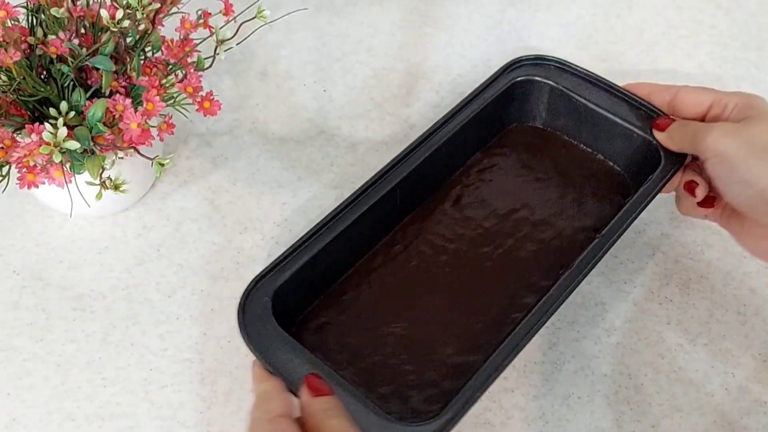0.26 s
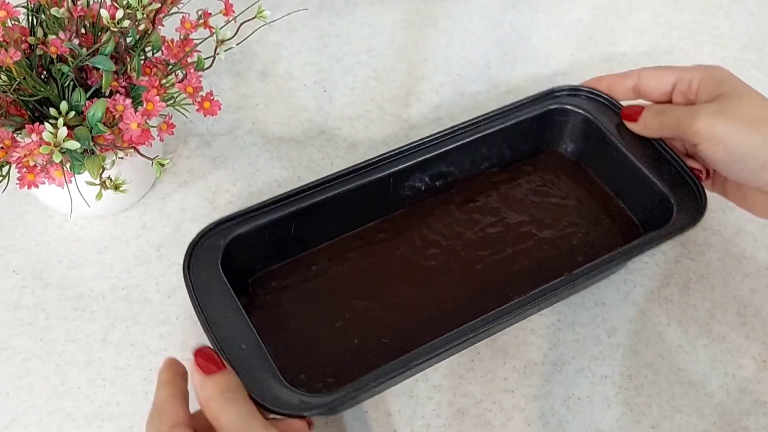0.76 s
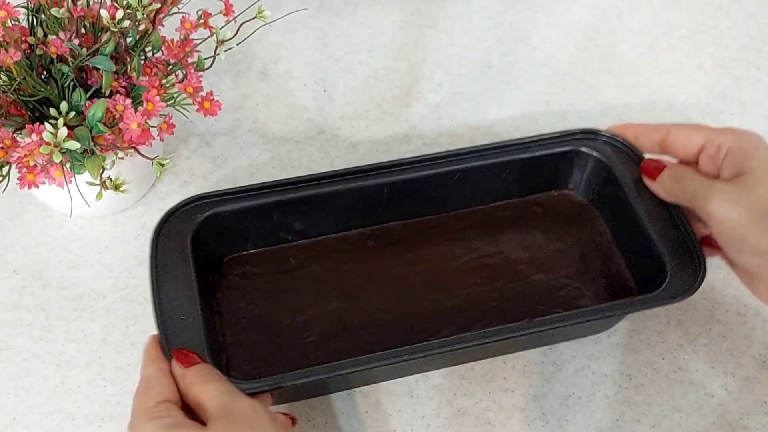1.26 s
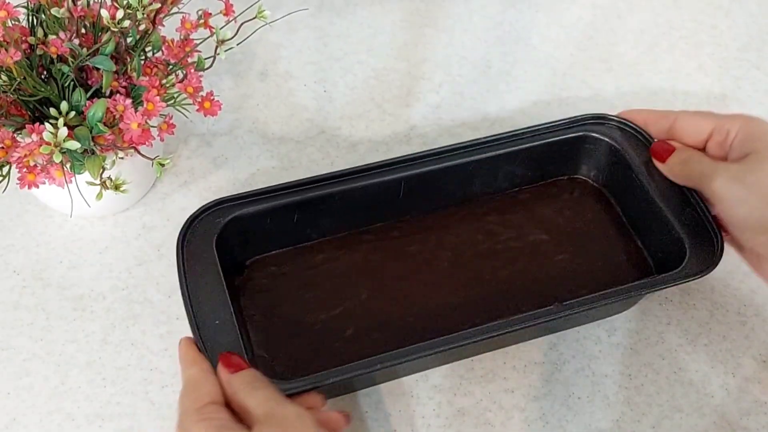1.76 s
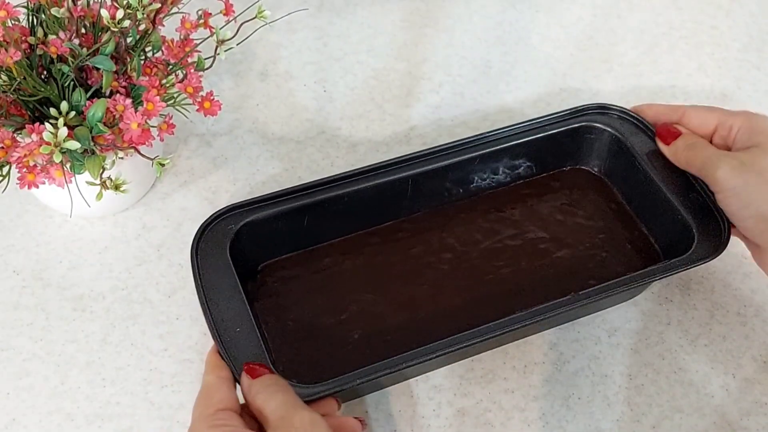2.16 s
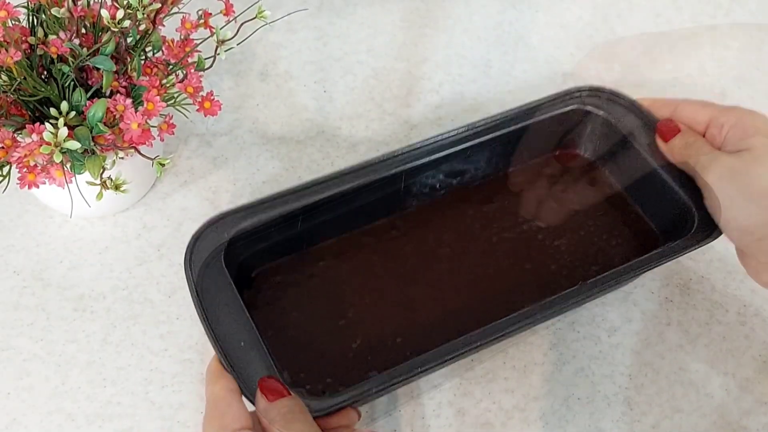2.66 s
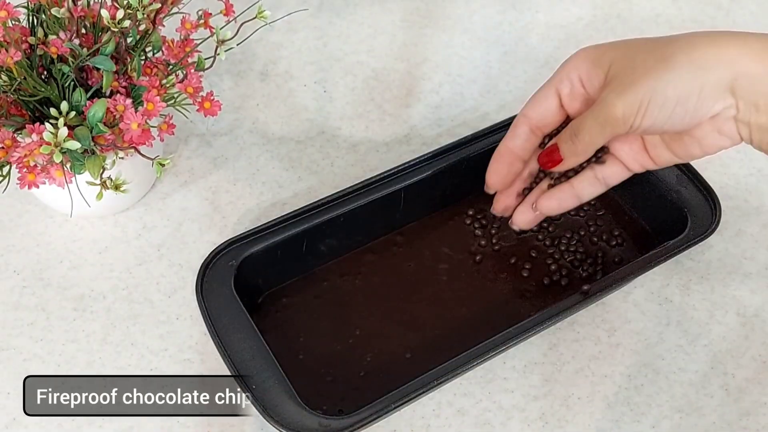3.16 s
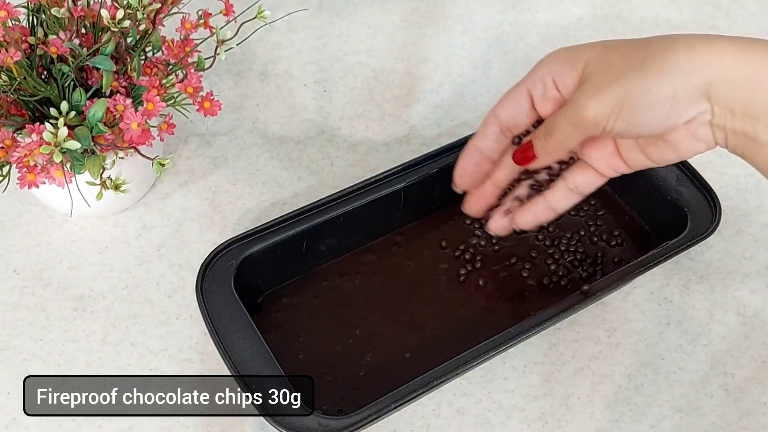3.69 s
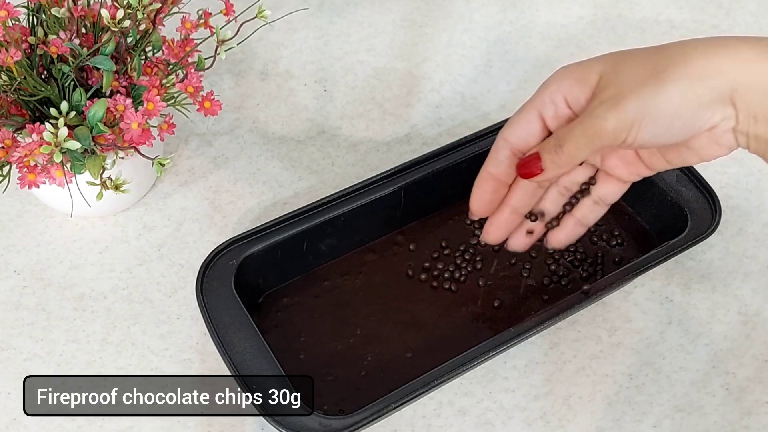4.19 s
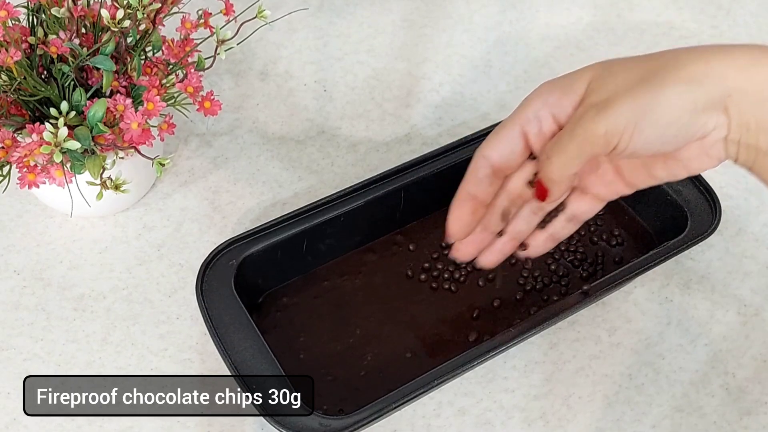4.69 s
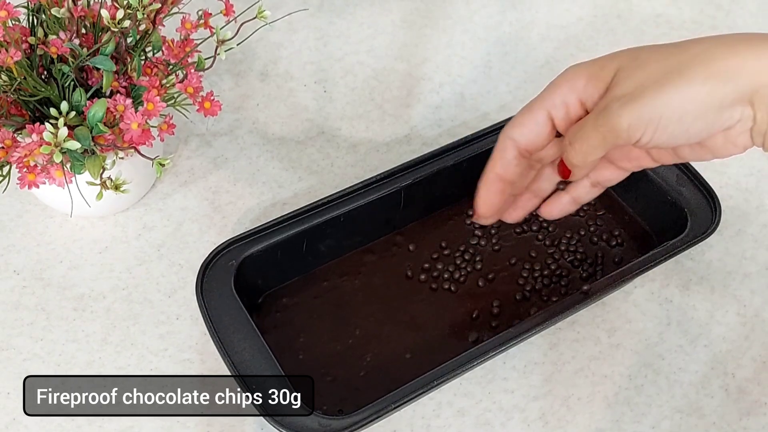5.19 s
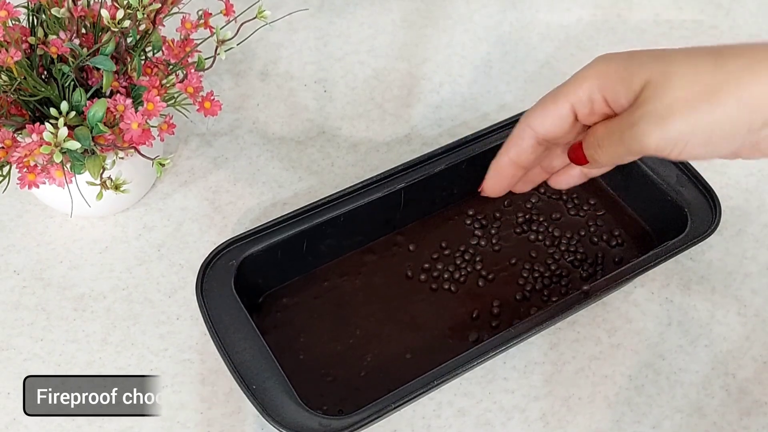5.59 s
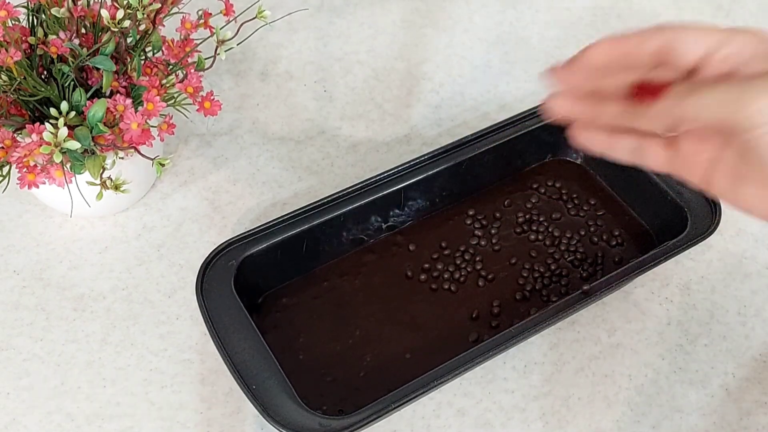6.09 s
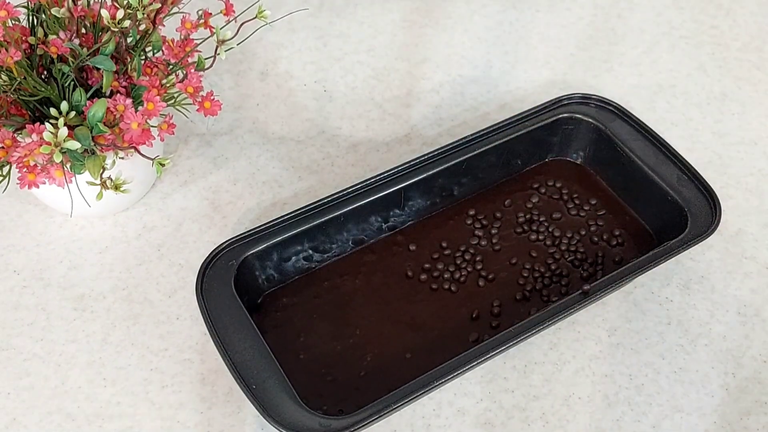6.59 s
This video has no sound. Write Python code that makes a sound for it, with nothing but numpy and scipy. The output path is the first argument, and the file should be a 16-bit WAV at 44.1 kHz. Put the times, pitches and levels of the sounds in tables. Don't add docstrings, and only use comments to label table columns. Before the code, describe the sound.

Low scraping and dull bumps of a baking pan, two hard ringing clunks, then sparse light chip ticks and faint skin rubs in a quiet room.

```python
import sys
import numpy as np
from scipy import signal
from scipy.fft import rfft, irfft, next_fast_len
from scipy.io import wavfile

SR = 44100
rng = np.random.default_rng(int(sys.argv[2]) if len(sys.argv) > 2 else 0)


def inscribe(sig):
    pcm = np.round(np.clip(np.atleast_2d(sig).T, -1, 1) * 32767)
    wavfile.write(sys.argv[1], SR, pcm.astype(np.int16))


def attenuation_scalar(level_db):
    decades = np.asarray(level_db, float) / 20
    return 10 ** decades


N = 302085

# f/Hz, level/dB [per Hz]
SLIDE_COLOUR = [(24, -35), (45, -18.5), (101, 0.5), (171, -19), (305, -12.5), (420, -14), (790, -19),
                (1210, -29.5), (2210, -31), (3400, -39), (7000, -41), (12800, -38), (16000, -42)]
# t/s, level/dB
DRAG = [(0.0, -57.5), (0.37, -60), (0.48, -72), (0.7, -72.5), (0.95, -70.5), (1.05, -62.5), (1.3, -61),
        (2.03, -67), (2.18, -80), (2.3, -69.5), (2.46, -71), (2.62, -99)]
DRAG_MEAN_DB = -60
# t/s, rumble level/dB, grit level/dB [over the rumble]
STROKES = [(0.0, -53.5, -10), (0.196, -51, -13.5), (0.32, -55.5, -18), (0.5, -66.5, -13.5), (0.71, -88, 5),
           (1.04, -69, -1.5), (1.1, -58.5, -24), (1.14, -67, -2.5), (1.2, -62.5, -5), (1.253, -49.5, -10),
           (1.345, -52, -11), (1.431, -56.5, -10), (1.537, -56.5, -9), (1.635, -49, -18),
           (1.699, -54, -8.5), (1.788, -51, -15), (1.851, -54.5, -11.5), (1.939, -53.5, -12.5),
           (2.021, -56, -10.5), (2.23, -61.5, -25)]
STROKE_HOLD_S = 0.0126
# level/dB [at mean drag], share of drag swing, share of grit, rise/(dB/s), fall/(dB/s)
FRICTION = [
    (-60, 1.3, 0.078, 317, 132),
    (-75.5, 1.4, 1.26, 326, 318),
    (-74.5, 1.5, 1.415, 278, 277),
]
# t/s, peak level/dB
BUMPS = [(1.094, -50), (1.231, -34.5), (1.254, -37.5), (1.403, -44), (1.606, -30), (1.622, -34),
         (1.766, -36.5), (1.801, -49), (1.921, -35.5), (1.938, -46)]
# t/s, peak level/dB, crack level/dB, thud level/dB, boom level/dB
KNOCKS = [
    (2.7540, -11, 5.5, -1, 1.5),
    (2.7608, -9, -0.5, 9, 3),
    (2.773, -24, -21, -5, 0),
    (3.1495, -21, 5.5, 12, 3.5),
    (3.156, -21.5, 6.5, 12.5, 8),
    (3.166, -28, -3, 19, 2),
]
LANDING_END = np.array([-1, 1, -1, -1, 1, -1])
# f/Hz, flat-blow level/dB, edge-blow level/dB, t60/s
BODY = [(107.5, -13.5, -2, 0.22), (152, -24.5, -16, 0.24), (256, -15, -8.5, 0.14), (296, -17.5, -12, .22),
        (343.7, -11.5, 2, 0.12), (374.5, -6.5, -10, 0.16), (476, -14, -34, 0.12), (507, -9, -19, 0.3),
        (535, 0, -15, 0.06), (545.8, 0, -17, 0.12), (660, -17.5, -21.5, 0.05), (700, -26, -12, 0.05),
        (766.6, -10.5, -4.5, 0.05), (822, -19, -17, 0.21), (830, -17.5, -6, .13), (925, -19.5, -24.5, 0.1),
        (979.5, -16.5, -25, 0.13), (1180, -27, -15, 0.14), (1400, -26, -56, 0.14), (1435, -26.5, -33, .07),
        (1500, -25, -44, .12), (1830, -31.5, -24, 0.13), (1930, -36.5, -31, .12)]
MODE_SPREAD, SPREAD_FULL_HZ = 0.8, 1000
# f/Hz, level/dB [per Hz]
KNOCK_COLOUR = [(24, -47), (45, -33), (105, -12), (150, -21), (200, -23), (290, -5), (540, -1.5), (800, -8),
                (1100, -17.5), (1900, -28.5), (2500, -37.5), (3100, -37), (5000, -44), (8000, -45.5),
                (12000, -47), (16000, -51.5)]
# f/Hz, t60/s
KNOCK_DECAY = [(60, 0.94), (250, 0.52), (700, 0.36), (2000, 0.47), (6000, 0.24), (14000, 0.26)]
# t/s, closing time/s
GRIPS = [
    (2.75, .23),
    (3.15, 0.14),
]
CHOKE_DB, CHOKE_STEEPNESS, CHOKE_FULL_DB = -6, 3.2, -35
# t/s, peak level/dB, body level/dB [re tick], left-right level/dB
HARD_CHIPS = [(3.003, -31, -19, 1.5), (3.0224, -53, -21, 11), (3.04, -36.5, -15, -3), (3.16, -61, -10, -1),
              (3.1784, -50, -10, 6), (3.215, -50, -10, -3), (4.02, -44.5, -18.5, -5.5),
              (4.1911, -30.5, -17.5, -1.5), (4.203, -52, -10, 8), (4.475, -29, -22.5, 1),
              (4.5162, -28, -18.5, -2), (4.5354, -30.5, -14.5, 2), (4.5576, -30, -22, -5.5),
              (4.538, -39, -13, 2), (4.5645, -39.5, -24, 10), (4.5986, -42.5, -21, 4),
              (4.587, -49, -24, -3), (4.6244, -61, -20, 1.5), (4.8078, -42, -26.5, 3),
              (4.8145, -50.5, -22, -1), (5.1278, -46, -21, -0.5), (5.2135, -43.5, -50.5, 4),
              (5.243, -48, -22, -2.5), (5.412, -52, -22, -1), (5.4146, -45.5, -24, 8),
              (5.4321, -41.5, -20, 0)]
# t/s, peak level/dB, left-right level/dB
SOFT_CHIPS = [(2.898, -55, 2.5), (2.9158, -48.5, 0), (3.1057, -48.5, 1), (3.3342, -48, -1.5),
              (3.3478, -43, 1), (3.493, -58.5, 2), (3.512, -58.5, -3.5), (3.5503, -52, -0.5),
              (3.5843, -51, 1), (3.5909, -49, -3), (3.6244, -57, 3), (3.665, -57, 4), (3.6995, -54, -3),
              (3.7618, -55, 2), (3.7774, -43.5, -2), (3.801, -47.5, 0), (3.8074, -45, 0.5),
              (3.8402, -52.5, -2), (3.927, -55, -9), (3.9415, -51.5, -4), (3.9677, -49, -7),
              (3.9843, -44, 0), (3.9914, -45.5, -2), (4.3089, -48.5, 0), (4.3375, -51, -1.5),
              (4.3638, -54, 1), (4.4012, -48, 1), (4.4055, -47, 2), (4.4251, -51, -1.5), (4.4441, -47, 0),
              (5.4025, -49, -3.5), (5.5667, -42.5, -2), (5.8423, -50.5, 5)]
# t/s, peak level/dB, body level/dB, left-right level/dB
NAILS = [(0.5055, -57, -21, -4), (0.5871, -61, -16, -16), (0.6937, -51, -12, -3), (0.737, -52.5, -25, -8),
         (0.779, -58.5, -17, -19), (0.806, -53, -22, -6), (0.86, -57, -21, -5), (1.3755, -44.5, -10, 5),
         (1.5423, -45, -7.5, 1), (1.606, -51.5, -2.5, 2), (1.698, -43.5, -8, -2), (1.8406, -60, 6, 0),
         (1.191, -57.5, 1, 6), (1.23, -53, -4, -3), (1.9212, -57, -8, -7), (2.207, -59, -17, -13),
         (2.558, -52, -39, 1.5), (4.7755, -55, -28, 3), (2.5727, -54, -40, -17)]
SOFT_BODY_DB, HARD_SNAP_DB, SOFT_SNAP_DB, NAIL_SNAP_DB = -29.5, -8, -10, -14
LOUD_DULL = 0.28
# f/Hz, level/dB [per Hz]
CHIP_COLOUR = [(330, -24), (600, -5.5), (1100, -6.5), (1500, -1.5), (2500, -3), (4000, -4.5), (6500, -0.5),
               (9000, 0), (12000, 1.5), (16000, -5)]
# t/s, level/dB
WALL_HITS = [(3.0025, -50.5), (3.0395, -52.5), (4.1906, -60), (4.475, -65), (4.5167, -58.5), (4.534, -67),
             (4.557, -52.5)]
# f/Hz, level/dB, t60/s
WALL = [(559, -5.5, 0.15), (980, -3.5, 0.038), (1423, 2, 0.02), (3650, -5, 0.053), (4900, 0, 0.069),
        (7200, -13, 0.049), (6500, -15, .06), (7800, -18, 0.055), (9550, 3, 0.017), (10900, 2, 0.049),
        (12350, -14, .05)]
# t/s, length/s, f/Hz, width/Hz, level/dB
RUBS = [(2.215, 0.085, 2000, 1296, -67.5), (2.247, 0.17, 2470, 160, -75), (3.645, 0.23, 3750, 3564, -76.5),
        (.692, 0.03, 2660, 240, -67), (.7, 0.065, 570, 70, -65.5), (4.666, 0.071, 2340, 700, -77),
        (5.673, 0.13, 4340, 3500, -74), (6.664, 0.092, 5450, 3900, -76.5), (6.82, 0.17, 7250, 4200, -65),
        (6.822, 0.12, 10830, 4900, -82)]
# f/Hz, level/dB [per Hz]
ROOM_TONE = [(20, -62), (34, -30), (50, -5), (75, -6.5), (135, -10), (162, -13), (282, -9), (440, -17),
             (600, -20.5), (1000, -32.5), (2000, -33), (5000, -36), (9000, -35), (16000, -38.5)]
ROOM_DB = -68.5
# f/Hz, left-right level/dB
ROOM_BALANCE = [(60, 12.5), (180, 4.5), (550, -1), (1650, 2.5), (4970, -1), (15000, 0)]
# f/Hz, width/Hz, level/dB
HUM = [
    (67.2, 9, -72.5),
    (128.9, 16, -77.5),
]
# f/Hz, correlation
LIKENESS = [(60, 0.97), (300, .88), (700, 0.0066), (1500, 0.11), (5000, 0.015), (14000, 0.13)]
# f/Hz, level/dB
MIC_COLOUR = [(2600, -2.5), (3050, -6.5), (3400, -5.5), (3800, -1.5), (4400, -2), (4950, 2.5), (5600, -0.5),
              (6800, 4.5), (7900, 0.5), (8700, -7.5), (10900, -5.5), (11800, -0.5), (15700, -0.5),
              (15900, -42.5)]
BAND_HZ = 30 * 2 ** (np.arange(19) / 2)


def slide():
    rumble, scuff, hiss = [friction_db(*layer) for layer in FRICTION]
    grain_db = 1.33 * drift(60.0)
    lean = np.array([[.4], [-.4]])

    def envelope(hz):
        if hz < 950:
            level_db = rumble + 0.5
        elif hz < 3400:
            level_db = scuff + 12.5
        else:
            level_db = hiss + 17.13
        return attenuation_scalar(level_db + lean * at_hz(ROOM_BALANCE, hz) + grain_db + 0.78 * drift(33.0))
    return noise_bands(SLIDE_COLOUR, envelope, -0.000073)


def friction_db(mean_db, follows, gritty, rise_db_per_s, fall_db_per_s):
    t = np.arange(0, 3, .001)
    s, peak_db, grit_db = np.transpose(STROKES)[:, :, None]
    drag_db = mean_db + follows * (np.interp(t, *np.transpose(DRAG), right=-120) - DRAG_MEAN_DB)
    slope = np.where(t < s, rise_db_per_s, fall_db_per_s)
    stroke_db = peak_db + gritty * grit_db - slope * np.maximum(abs(t - s) - STROKE_HOLD_S, 0)
    return np.interp(np.arange(N) / SR, t, np.maximum(drag_db, stroke_db.max(axis=0)))


def bumps():
    s, peak_db = np.transpose(BUMPS)
    mid, side = body(s, attenuation_scalar(peak_db - 16.0), True, 660)
    mid = mid + contact(s, attenuation_scalar(peak_db - 38.5), 487, 0.012)
    return placed(mid, -0.46, -0.000082) + side * [[1], [-1]]


def knocks():
    s, peak_db, crack_db, thud_db, boom_db = np.transpose(KNOCKS)

    def envelope(hz):
        bright = np.clip(np.log2(hz / 800) / 1.6, 0, 1)
        low_db = thud_db * (hz < 200) + boom_db * (200 < hz < 400)
        blow = clicks(s, attenuation_scalar(peak_db + bright * crack_db + low_db))
        rattle = attenuation_scalar(-10.0 + 11.0 * bright) * dying(blow, 0.03)
        room = attenuation_scalar(-20.0 + 3.0 * bright) * dying(blow, at_hz(KNOCK_DECAY, hz))
        swell = np.exp(-2 * np.pi * min(hz / 3.8, 2000) / SR)
        return signal.lfilter([1 - swell], [1, -swell], room + rattle)
    push = contact(s, LANDING_END * attenuation_scalar(peak_db + 0.05 * crack_db - 22.5), 600, 0.0085)
    mid, side = body(s, attenuation_scalar(peak_db - 6.5), s > 3, 2000)
    struck = placed(mid + push, -1.0, -0.000062) + side * [[1], [-1]]
    return grip() * (struck + noise_bands(KNOCK_COLOUR, envelope, -0.000063))


def body(times, sizes, on_edge, contact_hz):
    luck = rng.normal(0, 1, (len(times), len(BODY)))
    lean = rng.choice([-1, 1], len(BODY))
    out = 0
    for k, (hz, flat_db, edge_db, t60) in enumerate(BODY):
        level_db = np.where(on_edge, edge_db, flat_db) + 0.5 * luck[:, k]
        side = lean[k] * MODE_SPREAD * min(hz / SPREAD_FULL_HZ, 1) ** 2
        mode = ring(clicks(times, sizes * attenuation_scalar(level_db)), hz, t60)
        out = out + (-1) ** k * mode * np.array([[1], [side]])
    return signal.sosfilt(signal.butter(2, contact_hz, fs=SR, output="sos"), out)


def contact(times, sizes, hz, t60):
    swing = ring(ring(clicks(times, sizes), hz, t60), hz, t60)
    return signal.sosfilt(signal.butter(2, 200, "high", fs=SR, output="sos"), swing)


def grip():
    t, db = np.arange(N) / SR, np.zeros(N)
    for start, close_s in GRIPS:
        since = np.maximum(t - start, 0) / close_s
        choke_db = np.maximum(CHOKE_DB * since ** CHOKE_STEEPNESS, CHOKE_FULL_DB)
        db = np.where(t >= start, choke_db, db)
    return attenuation_scalar(db)


def ticks():
    s, peak_db, body_db, snap_db, pan_db = tick_rows()
    luck = rng.normal(0, 1, (len(s), len(BAND_HZ)))
    is_nail = np.arange(len(s)) >= len(s) - len(NAILS)
    body_db = np.where(is_nail, body_db, np.minimum(body_db, -10))
    soft_db = np.minimum(peak_db + 31.5, 0)

    def strike(db):
        return np.array([clicks(s, attenuation_scalar(db + side * pan_db / 2)) for side in (1, -1)])

    def envelope(hz):
        if hz < 400:
            return 0
        db = peak_db + 1.77 * luck[:, np.searchsorted(BAND_HZ, hz)]
        db = db + np.clip(np.log2(4500 / hz), 0, 1) * (body_db + 13.5)
        if 3400 < hz < 11000:
            db = db + snap_db + 6.0
        elif hz > 11000:
            db = db - 0.8 * ~is_nail * (snap_db + 6.0)
        if hz > 11000:
            db = db - LOUD_DULL * np.maximum(peak_db + 51, 0)
        hit, pan = strike(db), strike(db + 0.27 * soft_db)
        tick = attenuation_scalar(-8.5) * dying(hit, 0.0046) + attenuation_scalar(-16.5) * dying(hit, 0.021)
        scatter = attenuation_scalar(-11.5) * dying(pan, 0.057)
        room_db = -24 - 2.0 * np.log2(max(hz, 1500) / 5000)
        return tick + scatter + attenuation_scalar(room_db) * dying(hit, 0.95 * at_hz(KNOCK_DECAY, hz))
    return noise_bands(CHIP_COLOUR, envelope, -.00013)


def tick_rows():
    hard = [(s, db, body_db, HARD_SNAP_DB, pan_db) for s, db, body_db, pan_db in HARD_CHIPS]
    soft = [(s, db, SOFT_BODY_DB, SOFT_SNAP_DB, pan_db) for s, db, pan_db in SOFT_CHIPS]
    nails = [(s, db, body_db, NAIL_SNAP_DB, pan_db) for s, db, body_db, pan_db in NAILS]
    return np.transpose(hard + soft + nails)


def wall():
    s, hit_db = np.transpose(WALL_HITS)
    luck = rng.normal(0, 1, (len(s), len(WALL)))
    rings = 0
    for k, (hz, db, t60) in enumerate(WALL):
        rings = rings + ring(clicks(s, attenuation_scalar(hit_db + db + 2 * luck[:, k])), hz, t60)
    return placed(rings, -1.0, -0.00001)


def rubs():
    t, out = np.arange(N) / SR, 0
    white = rng.standard_normal((2, N))
    for start, length, hz, width, db in RUBS:
        stroke = np.interp(t, [start, start + 0.097 * length, start + length], [0, 1, 0])
        out = out + attenuation_scalar(db) * stroke * rms_one(ring(white, hz, 5.2 / width))
    return out


def room_tone():
    lean = np.array([[.5], [-.5]])

    def envelope(hz):
        return attenuation_scalar(ROOM_DB + lean * at_hz(ROOM_BALANCE, hz) + 1.84 * drift(3.0))
    air = noise_bands(ROOM_TONE, envelope, 0.00012)
    white = rng.standard_normal(N)
    drone = sum(attenuation_scalar(db) * rms_one(ring(white, hz, 6.0 / width)) for hz, width, db in HUM)
    return air + placed(drone, 12.0, .0001)


def noise_bands(colour, envelope, lag_s=0):
    size = next_fast_len(N)
    hz = np.maximum(np.fft.rfftfreq(size, 1 / SR), 1)
    colour_gain = attenuation_scalar(at_hz(colour, hz) + at_hz(MIC_COLOUR, hz))
    mid, side = rfft(rng.standard_normal((2, size))) * colour_gain
    alike = np.clip(at_hz(LIKENESS, hz), -1, 1)
    pair = np.sqrt(1 + alike) * mid + np.sqrt(1 - alike) * side * [[1], [-1]]
    pair = pair * size / np.sqrt(np.sum(abs(pair) ** 2))
    pair = pair * np.exp(-2j * np.pi * hz * lag_s * np.array([[0], [1]]))
    held_hz = np.clip(hz, BAND_HZ[0], BAND_HZ[-1])
    out = 0
    for centre in BAND_HZ:
        share = np.clip(1 - 2 * abs(np.log2(held_hz / centre)), 0, 1)
        out = out + irfft(pair * share, size)[:, :N] * envelope(centre)
    return out


def placed(x, pan_db, lag_s):
    late = np.interp(np.arange(N) - lag_s * SR, np.arange(N), x)
    return np.array([x * attenuation_scalar(pan_db / 2), late * attenuation_scalar(-pan_db / 2)])


def ring(x, hz, t60):
    r, w = attenuation_scalar(-60 / (t60 * SR)), 2 * np.pi * hz / SR
    return signal.lfilter([0, np.sin(w)], [1, -2 * r * np.cos(w), r * r], x)


def dying(x, t60):
    return np.sqrt(signal.lfilter([1], [1, -attenuation_scalar(-120 / (t60 * SR))], x ** 2 + 1e-30))


def clicks(times, sizes):
    out = np.full(N, 1e-18)
    np.add.at(out, np.round(np.asarray(times) * SR).astype(int), sizes)
    return out


def drift(rate):
    r = np.exp(-80 * np.pi * rate / SR)
    slow = signal.lfilter([1], [1, -2 * r, r * r], rng.standard_normal(N // 40 + 2002))[2000:]
    return np.interp(np.arange(N) / 40, np.arange(len(slow)), rms_one(slow))


def at_hz(points, hz):
    point_hz, values = np.transpose(points)
    return np.interp(np.log(hz), np.log(point_hz), values)


def rms_one(x):
    return x / np.sqrt(np.mean(x ** 2) + 1e-20)


def scene():
    return slide() + bumps() + knocks() + ticks() + wall() + rubs() + room_tone()


def roll_off(x):
    return signal.sosfilt(signal.butter(12, 16820, fs=SR, output="sos"), x)


def record(dry):
    cut = signal.sosfilt(signal.cheby2(10, 60, 16900, fs=SR, output="sos"), dry)
    cut = signal.sosfilt(signal.butter(2, 36, "high", fs=SR, output="sos"), cut)
    return roll_off(cut)


dry = scene()
out = record(dry)
inscribe(out)
```